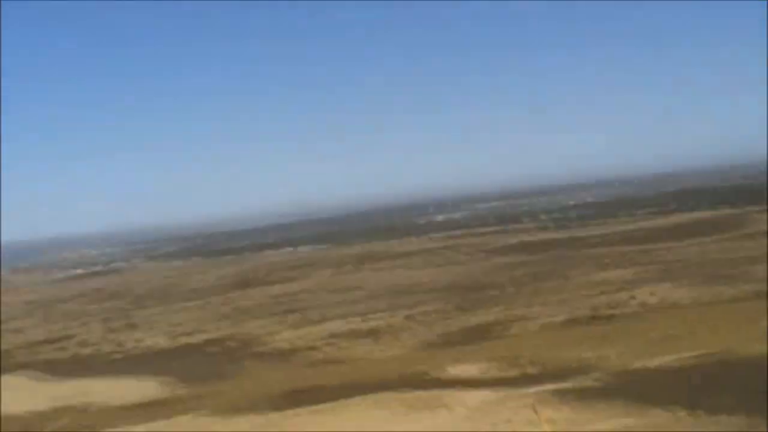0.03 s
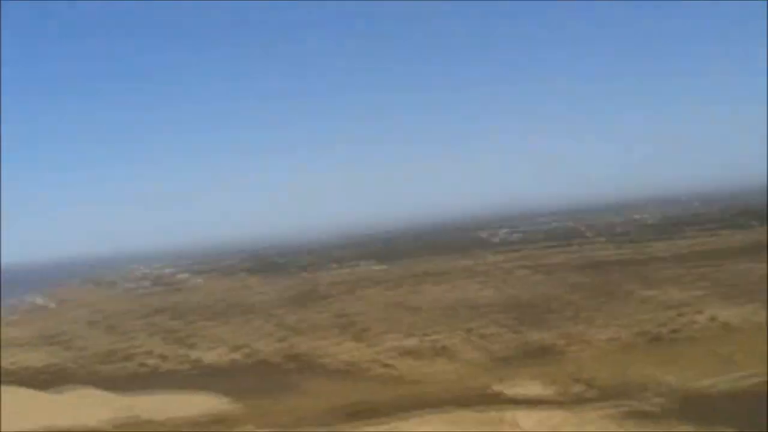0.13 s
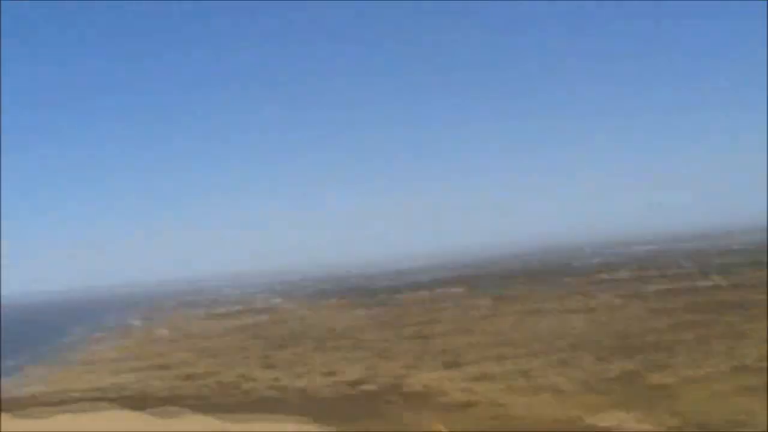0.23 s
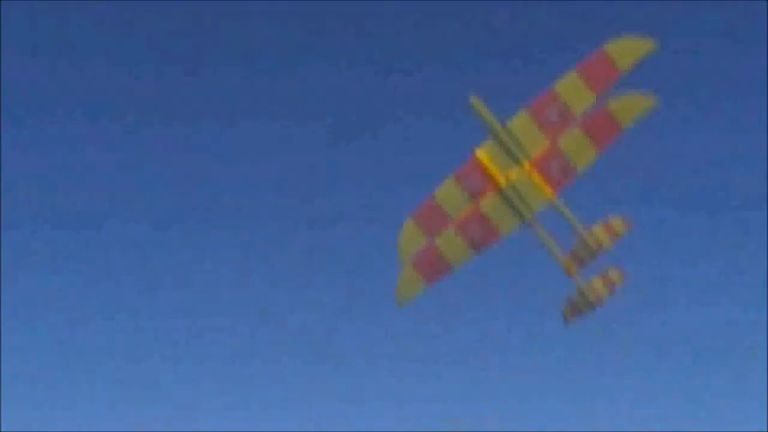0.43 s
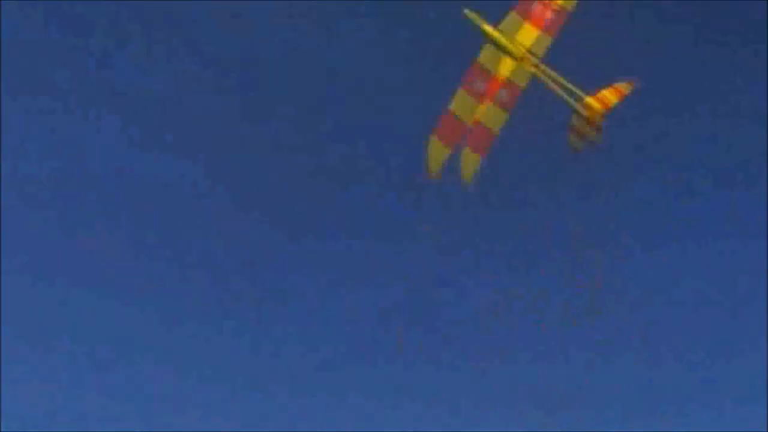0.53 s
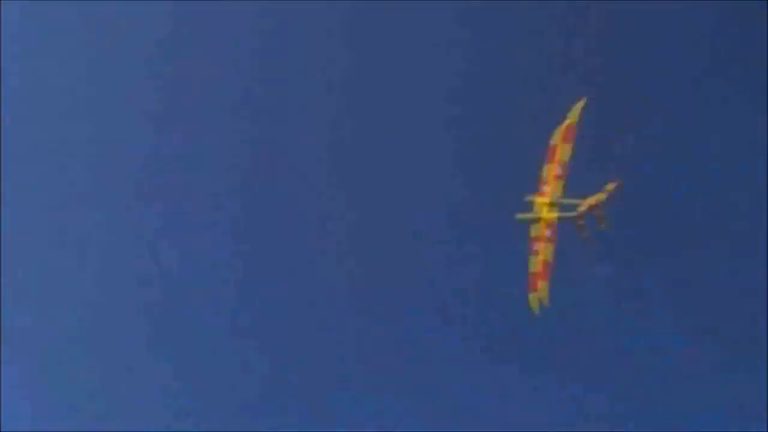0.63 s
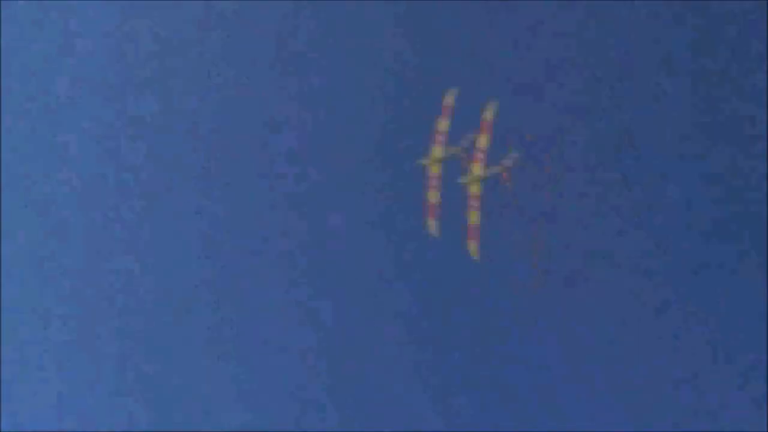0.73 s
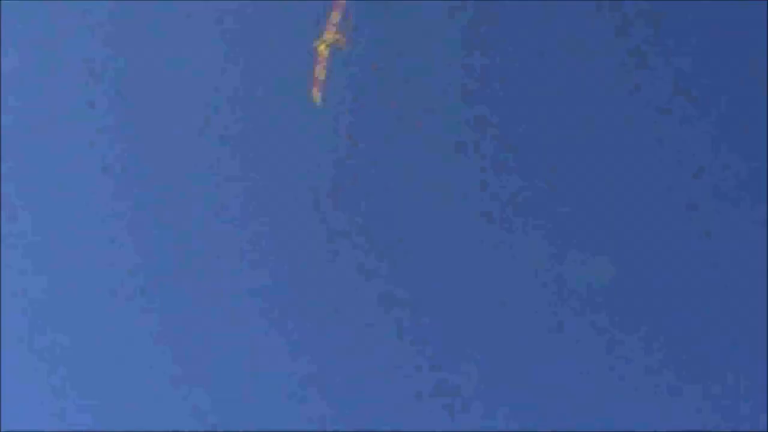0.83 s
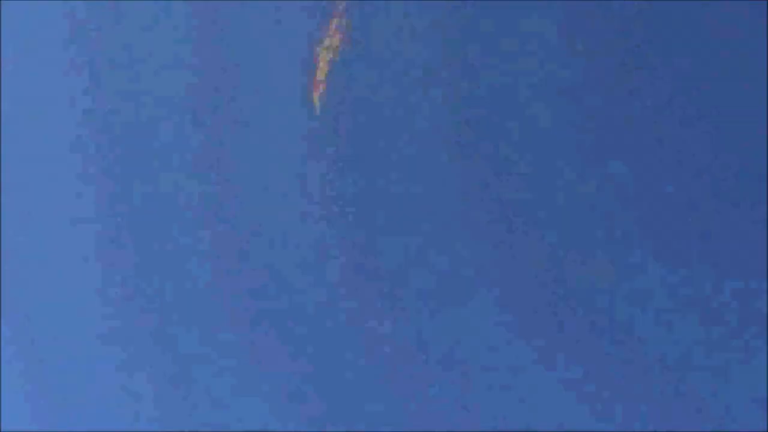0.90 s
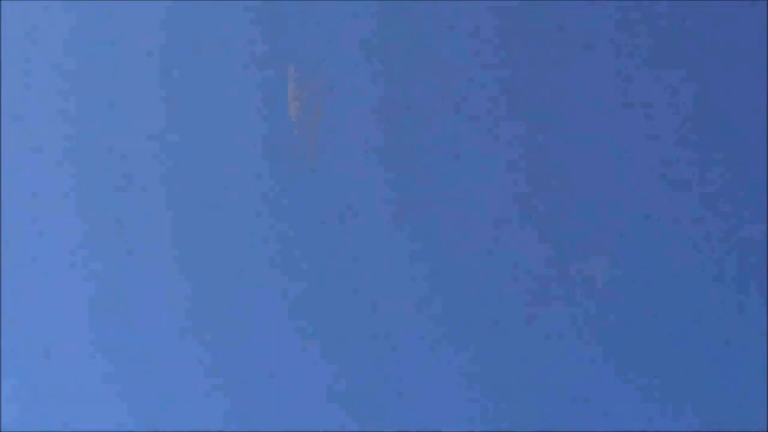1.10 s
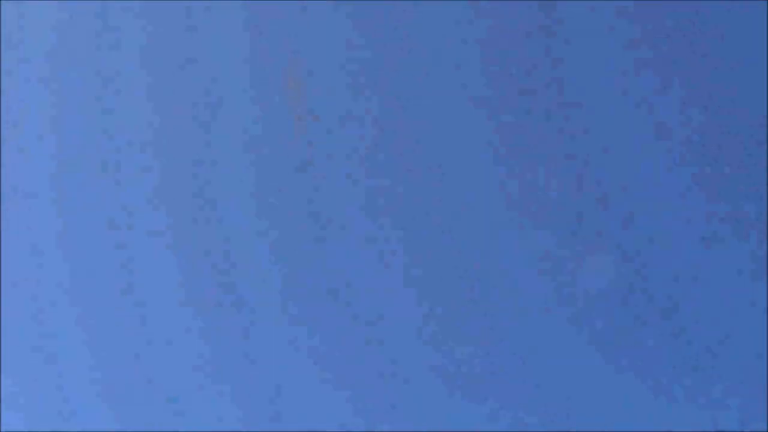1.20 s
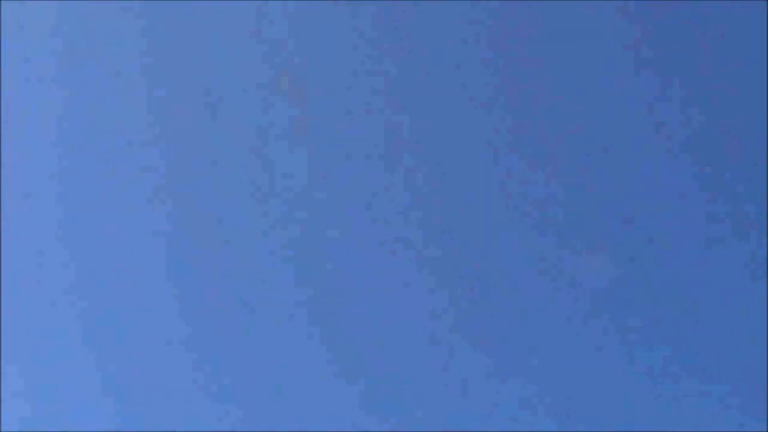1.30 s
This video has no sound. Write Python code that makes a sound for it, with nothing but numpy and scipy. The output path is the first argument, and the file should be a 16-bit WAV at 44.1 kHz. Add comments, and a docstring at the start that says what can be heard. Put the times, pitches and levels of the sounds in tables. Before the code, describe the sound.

A shrill, wavering whistle and rush of air as model gliders pass over windy ground.

```python
"""On a windy hilltop, model gliders dive past. Air crossing an edge on the first one whistles near 5 kHz,
clean at first, then rough as higher tones compete, and loud enough to overload the microphone.
Air rushing over the wings makes a whoosh. The whistle drops in pitch and the hiss dulls with
distance, leaving faint lower whistles over the wind."""
import sys
import numpy as np
from scipy import signal
from scipy.fft import rfft, irfft
from scipy.io import wavfile

SR = 44100
rng = np.random.default_rng(int(sys.argv[2]) if len(sys.argv) > 2 else 0)


def generate_wav(signal):
    """Clip the signal to [-1, 1] and save it as 16-bit WAV at the path in sys.argv[1]."""
    frames = np.transpose(np.atleast_2d(signal))
    scaled = np.clip(frames, -1, 1) * 32767
    pcm = np.round(scaled).astype(np.int16)
    wavfile.write(sys.argv[1], SR, pcm)


N = 59535
T = np.arange(N) / SR
OPPOSITE = np.array([[1], [-1]])  # adds a signal on the left and subtracts it on the right


def gain(db):
    """Turn decibels into a number to multiply by."""
    return 10 ** (np.asarray(db) / 20)


def curve(table, column=1):
    """Join the points in one column of a table with straight lines over time."""
    rows = np.array(table, float)
    return np.interp(T, rows[:, 0], rows[:, column])


def colour(sound, points):
    """Make some frequencies louder and others softer, following (f/Hz, level/dB) points."""
    hz, db = np.array(points, float).T
    freqs = np.fft.rfftfreq(N, 1 / SR)
    levels_db = np.interp(np.log(freqs + 1), np.log(hz), db)
    return irfft(rfft(sound) * gain(levels_db), N)


def normalise(sound):
    """Scale a signal to an average power of 1."""
    return sound / np.sqrt(np.mean(np.abs(sound) ** 2))


def wander(rate):
    """A smooth random wobble of typical size 1 that changes about `rate` times a second."""
    freqs = np.fft.rfftfreq(N, 1 / SR)
    return normalise(irfft(rfft(rng.standard_normal(N)) * np.exp(-(freqs / rate) ** 2), N))


def tone(hz):
    """A tone whose pitch may move, as a point going round a circle; its .real part is the sound."""
    return np.exp(2j * np.pi * np.cumsum(hz + np.zeros(N)) / SR)


def breathy_tone(hz, width_hz):
    """A tone that wavers in strength and timing; the wider it is, the more it sounds like noise."""
    return (wander(width_hz / 2) + 1j * wander(width_hz / 2)) * tone(hz)


def air_noise(points):
    """The noise of swirling air in a given colour, a little different on the left and right."""
    # level of the side (opposite) part against the mid (shared) part: f/Hz, level/dB
    stereo_width = [(40, 9), (110, -7), (250, -13), (600, -10), (2000, -11.5), (5500, -11.5), (9000, -6),
                    (14000, -3)]
    mid = colour(rng.standard_normal(N), points)
    side = colour(colour(rng.standard_normal(N), points), stereo_width)
    return (mid + side * OPPOSITE) / np.std(mid)


def swell(at, rise, fall):
    """A bell-shaped rise and fall in loudness that peaks at time `at`; all in seconds."""
    return np.exp(-.5 * ((T - at) / np.where(T < at, rise, fall)) ** 2)


def wind():
    """Wind blows over the slope; low gusts push the microphone's two sides mostly in opposite ways."""
    # colour of the steady wind: f/Hz, level/dB
    wind_colour = [(20, -33), (60, -28), (150, -4), (300, -1.5), (650, 1), (1000, -2.5), (1500, -6),
                   (2500, -15.5), (5000, -27.5), (11000, -52), (15000, -75)]
    # strength of the steady wind: t/s, level/dB
    wind_level = [(.07, -42.5), (.2, -46.5), (.45, -47.5), (.8, -46.5), (1.18, -46.5), (1.35, -48)]
    # gusts hitting the microphone: t/s, rise/s, fall/s, level/dB
    gusts = [(.085, .015, 0.064, -61.5), (.37, 0.039, 0.09, -53), (.585, .02, .015, -57),
             (.815, 0.012, 0.022, -52.5), (.86, 0.012, .015, -50), (.92, 0.024, 0.025, -57),
             (1.09, 0.0062, 0.018, -47.5), (1.19, 0.041, .012, -45), (1.345, 0.0084, .012, -57)]
    # colour of a gust's rumble: f/Hz, level/dB
    gust_colour = [(20, -15), (50, -15), (90, 5), (160, -11.5), (300, -7), (600, -28), (3000, -73)]
    sway_db, shared_db = -0.57, -10.5
    steady = air_noise(wind_colour) * gain(curve(wind_level) + sway_db * wander(25))
    gust_strength = sum(swell(at, rise, fall) * gain(db) for at, rise, fall, db in gusts)
    mid, side = (normalise(colour(rng.standard_normal(N), gust_colour)) for _ in range(2))
    return steady + gust_strength * (gain(shared_db) * mid + side * OPPOSITE)


def faint_tones():
    """Faint breathy tones come and go; a high rasp sounds while the whistle overloads the microphone."""
    # one tone or rasp a row: loudest t/s, rise/s, fall/s, f/Hz, glide/(Hz/s), width/Hz, level/dB
    tones = [(.226, 0.0093, 0.011, 2830, -6, 800, -44), (.388, .035, 0.026, 8590, -3000, 850, -31.5),
             (.511, 0.011, 0.009, 3006, -16000, 110, -34.5), (0.681, 0.045, 0.039, 3570, -500, 380, -46.5),
             (.995, 0.044, 0.07, 1800, -250, 194, -47.5), (1.005, 0.026, 0.036, 2366, 2, 1120, -51)]
    sound = np.zeros(N)
    for at, rise, fall, hz, glide, width, db in tones:
        gliding_hz = hz + glide * np.clip(T - at, -3 * rise, 3 * fall)
        sound += breathy_tone(gliding_hz, width).real * swell(at, rise, fall) * gain(db)
    return sound


def wing_rush():
    """Air over the wings hisses on approach, whooshes overhead with a puff of wake, then dulls."""
    # loudness of the three parts of the rush: t/s, body level/dB, middle level/dB, hiss level/dB
    levels = [(.07, -52, -42.5, -45.5), (.2, -50, -50, -44.5), (.38, -39, -39.5, -31),
              (.468, -44.5, -37, -31.5), (.505, -36, -33.5, -34.5), (.565, -34, -40, -34.5),
              (.6, -37.5, -42, -35), (.68, -46, -44.5, -41.5), (.76, -47.5, -45, -46.5),
              (.89, -60, -54.5, -54.5), (1.0, -48, -54, -56.5), (1.1, -51.5, -56, -60),
              (1.35, -62, -62.5, -66.5)]
    # colours of the low body, the middle and the high hiss: f/Hz, level/dB
    body = [(60, -27), (180, -14), (380, -4), (800, 0), (1350, -1.5), (2000, -17.5), (4000, -25),
            (12000, -75)]
    middle = [(700, -34), (1500, -1), (2100, 0), (2900, 2.5), (3600, -0.5), (4400, 1), (7000, -21),
              (14000, -74)]
    hiss = [(2000, -50), (3800, -6), (5000, 3.5), (7300, -1), (9500, -8), (11500, -19.5), (13300, -27),
            (14500, -50), (16000, -65)]
    flicker_db = 1.07 * wander(105)
    rush = sum(air_noise(part) * gain(curve(levels, column) + flicker_db)
               for column, part in enumerate((body, middle, hiss), start=1))
    wake_s, wake_hz, wake_db = .566, 398, -29.5  # the wake is the stirred air behind a wing
    puff = np.sin(2 * np.pi * wake_hz * (T - wake_s)) * swell(wake_s, rise=.002, fall=.004)
    return rush + puff * gain(wake_db)


def edge_whistle():
    """Air crossing an edge makes a wavering tone; unsteady tones just above it clash and sound rough."""
    # pitch of the clean tone: t/s, f/Hz
    pitch = [(.24, 5110), (.27, 5135), (.315, 5040), (.35, 4900), (.385, 4795), (.41, 4830), (.435, 4945),
             (.474, 5020), (.487, 4790), (.496, 4830), (.504, 5060), (.52, 4770), (.531, 4520), (.56, 4370)]
    # loudness of the whistle: t/s, clean level/dB, rough level/dB
    levels = [(.234, -56, -52), (.243, -26, -32), (.251, -21, -28), (.261, -15, -35), (.276, -15, -33),
              (.288, -21, -22), (.3, -33, -26), (.306, -19, -24), (.34, -21.5, -20), (.385, -16.5, -15.5),
              (.43, -17, -17), (.452, -16, -22), (.472, -15.5, -28), (.493, -25, -29), (.503, -24, -28),
              (.512, -45, -34), (.522, -28, -33), (.532, -32, -42), (.543, -35, -47), (.565, -60, -66),
              (.62, -90, -90)]
    # the competing tones: f above the clean tone/Hz, width/Hz, relative level/dB
    upper_tones = [(225, 80, 0), (450, 70, -3), (370, 460, 0), (0, 500, -15)]
    waver_hz, flutter_db, wobbles_per_s = 32, 1.9, 170
    left_delay_s = .00001
    hz = curve(pitch) + waver_hz * wander(wobbles_per_s)
    clean = tone(hz) * gain(curve(levels, column=1) + flutter_db * wander(wobbles_per_s))
    upper = sum(gain(db) * breathy_tone(hz + above, width) for above, width, db in upper_tones)
    rough = normalise(upper) * gain(curve(levels, column=2))
    right = np.sqrt(2) * (clean + rough)  # makes up for the power that .real drops
    left = right * np.exp(-2j * np.pi * hz * left_delay_s)
    return np.array([left, right]).real


def scene():
    """Gliders and wind in the open air, with no echo."""
    return edge_whistle() + faint_tones() + wing_rush() + wind()


def record(dry):
    """The microphone starts after a moment, overloads on the whistle and turns itself down a little."""
    # how the microphone colours the sound: f/Hz, level/dB
    mic_colour = [(20, 2.5), (3500, 0), (4100, -3.5), (4450, -3.5), (4800, 0.4), (5200, -0.5), (5600, -1.9),
                  (6300, -4), (7300, .5), (8200, -2.5), (9400, 2), (10300, 0), (11400, 3), (12500, 1.5),
                  (15500, -1)]
    # stereo balance: t/s, left minus right level/dB
    balance = [(.07, -1.7), (.4, -0.3), (.56, -1.5), (.9, -0.1), (1.35, .3)]
    overload, lopsided, hardness = 0.12, 0.0012, 6.
    cut_db, follow_s = 2, 0.054  # the volume cut at full overload, and how slowly it follows
    start_s, fade_s, top_hz = 0.061, 0.012, 15800
    # squash the peaks at four times the sample rate, which keeps false tones down
    fine = signal.resample_poly(dry, up=4, down=1, axis=1, padtype="edge")
    ceiling = overload * (1 + lopsided * np.sign(fine))
    squashed = fine / (1 + np.abs(fine / ceiling) ** hardness) ** (1 / hardness)
    heard = colour(signal.resample_poly(squashed, up=1, down=4, axis=1, padtype="edge"), mic_colour)
    step = 1 / (follow_s * SR)
    recent_load = signal.lfilter([step], [1, step - 1], np.abs(heard).mean(axis=0)) / overload
    volume = gain(curve(balance) * OPPOSITE / 2 - cut_db * recent_load)
    fade_in = np.clip((T - start_s) / fade_s, 0, 1)
    treble_cut = signal.ellip(10, .2, 80, top_hz, fs=SR, output="sos")
    return signal.sosfilt(treble_cut, heard * volume * fade_in)


dry = scene()
out = record(dry)
generate_wav(out)
```